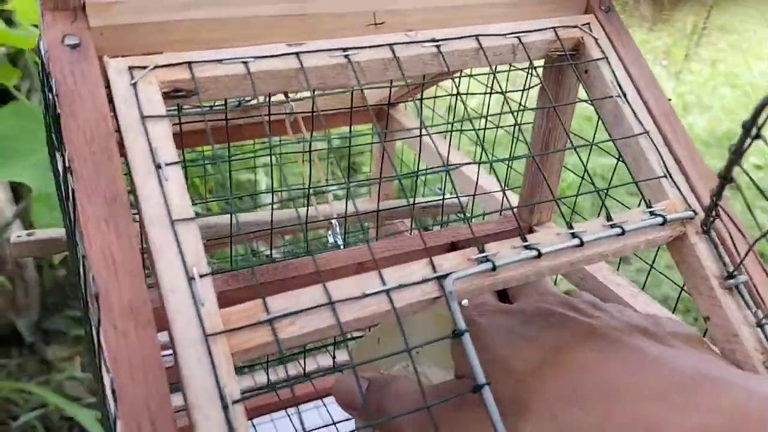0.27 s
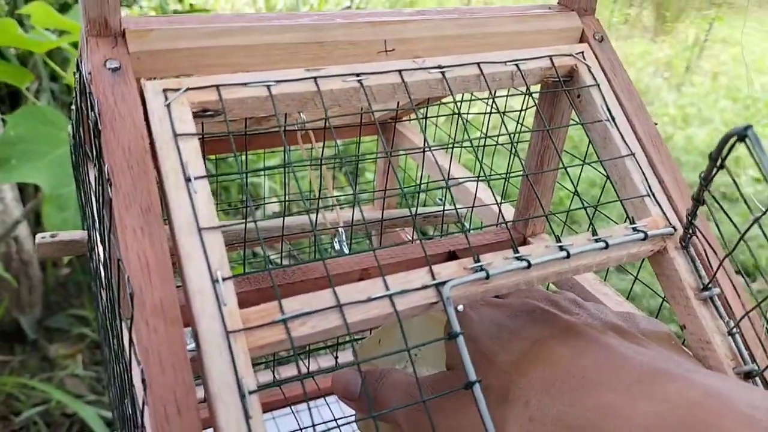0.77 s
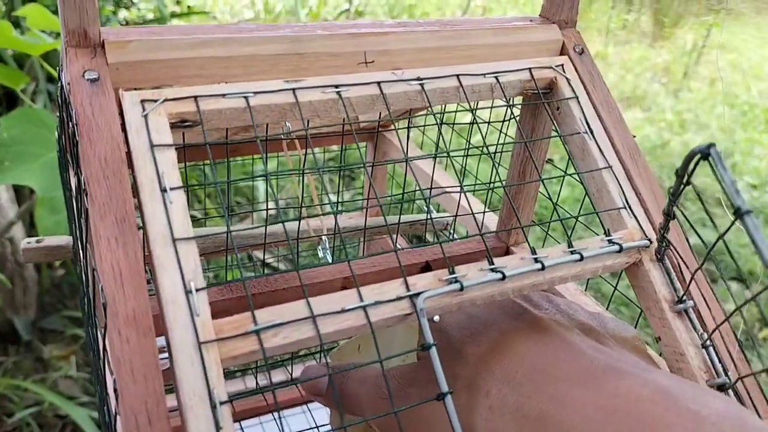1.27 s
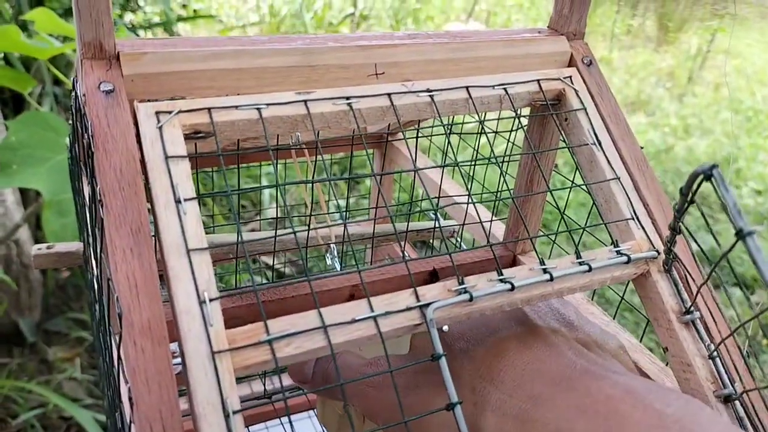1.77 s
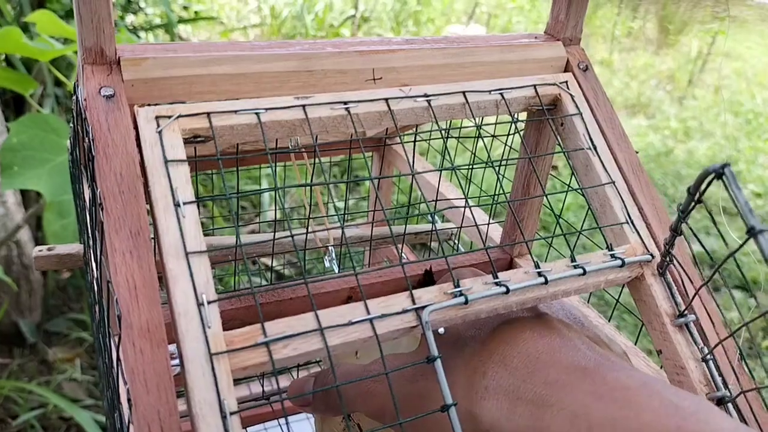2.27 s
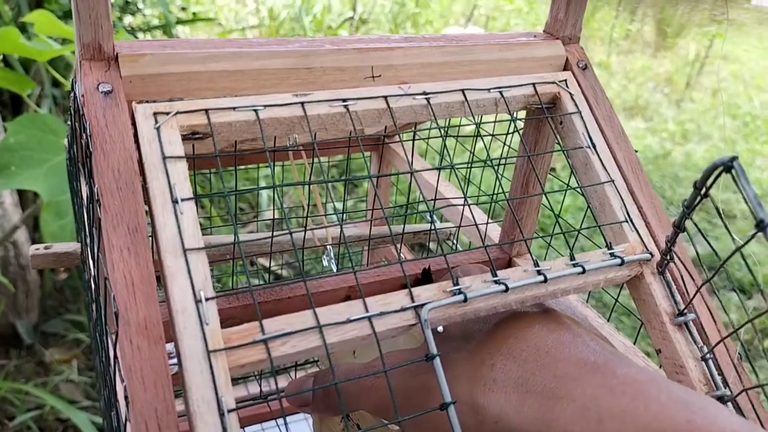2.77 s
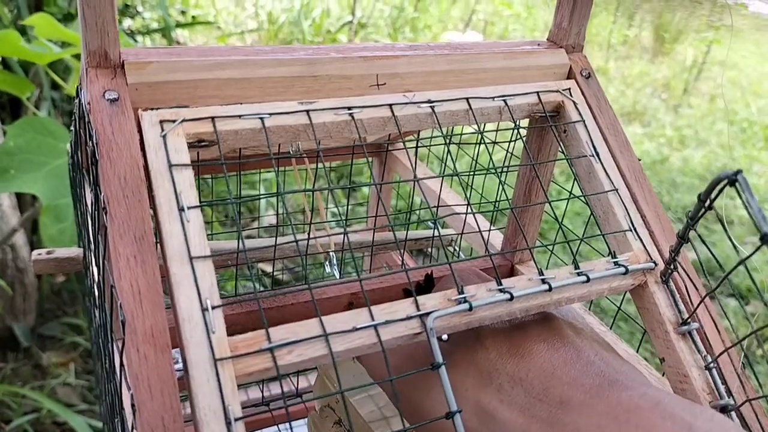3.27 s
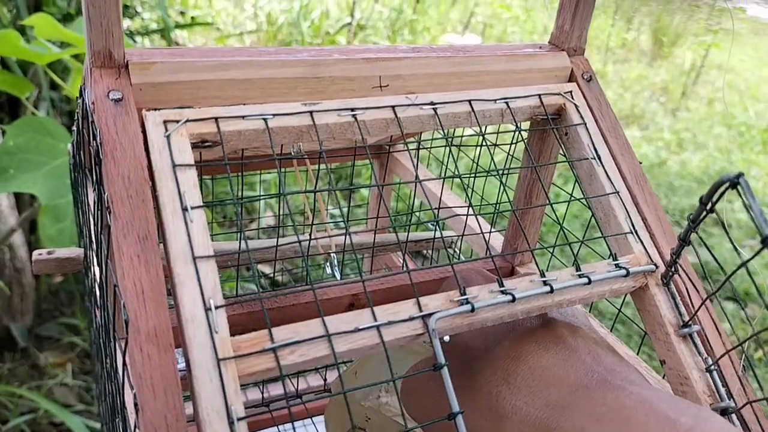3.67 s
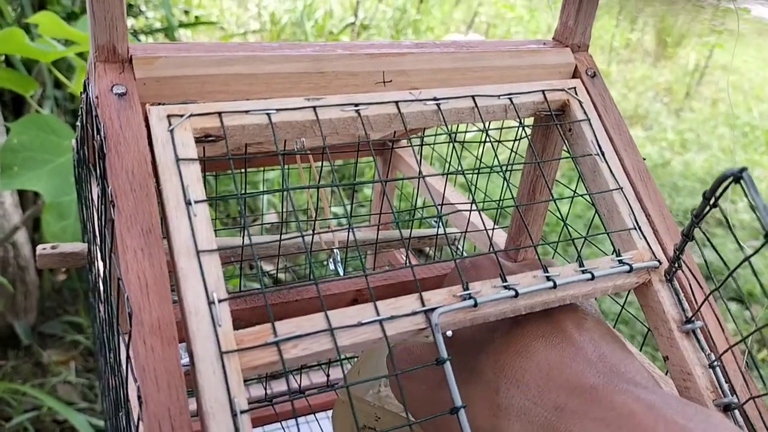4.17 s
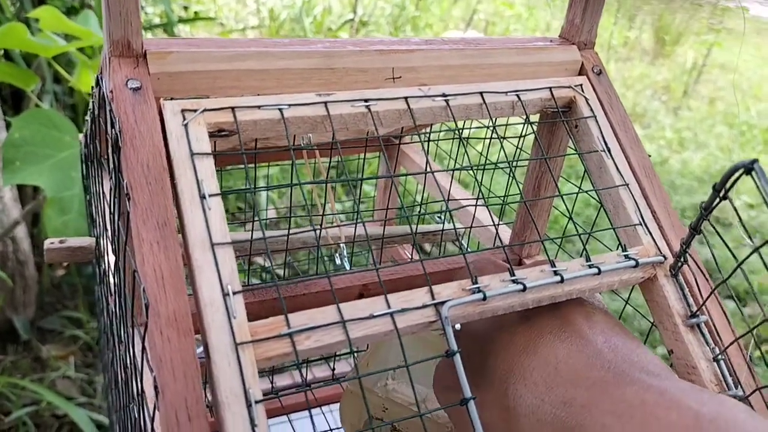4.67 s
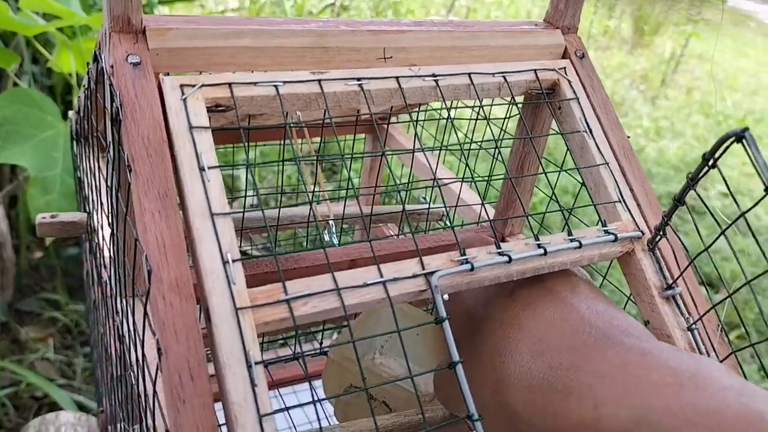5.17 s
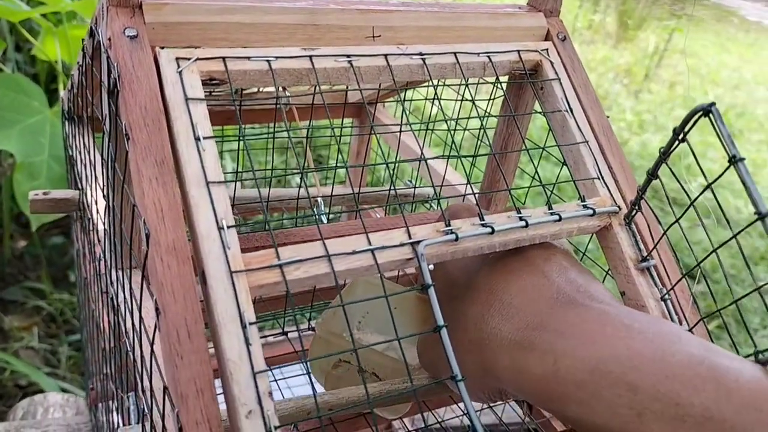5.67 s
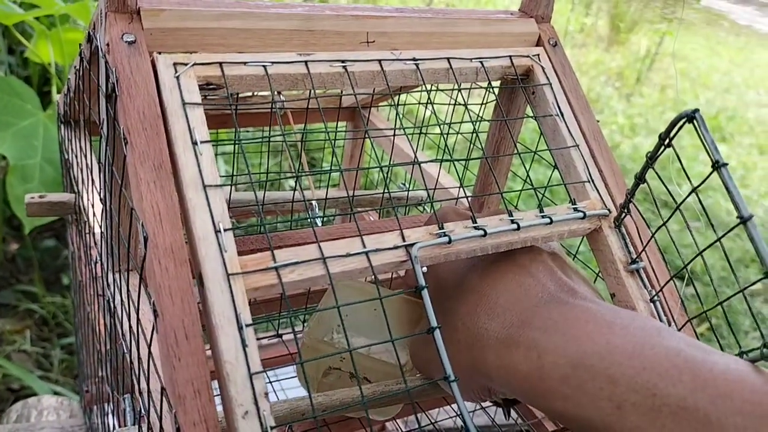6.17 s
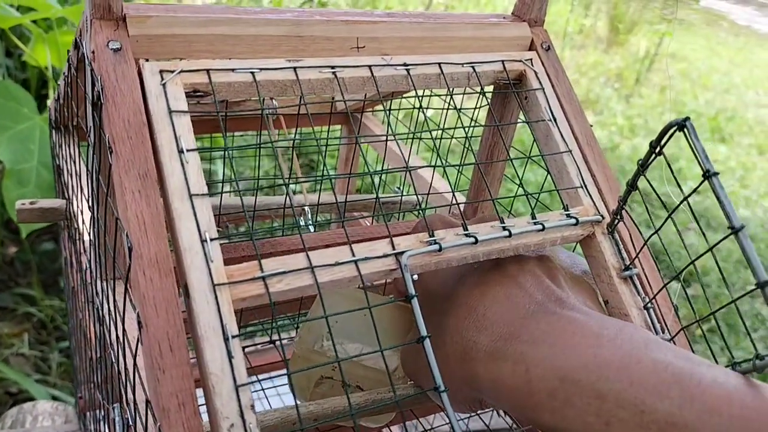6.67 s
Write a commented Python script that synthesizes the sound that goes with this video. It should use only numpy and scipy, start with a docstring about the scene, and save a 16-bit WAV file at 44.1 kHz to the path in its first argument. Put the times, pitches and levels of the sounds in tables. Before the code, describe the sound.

A soft rush of outdoor air and a faint, low engine drone far away run throughout. From about 0.6 to 1 second, a small bird in a nearby cage gives four quick, high, rising chirps, with a soft wooden bump at the last. Between 1 and 4 seconds the wire mesh ticks lightly and is brushed faintly by a reaching arm, while distant birds add a few thin whistles. A short cluster of knocks on the wooden frame comes around 3.7 seconds, and a wire snaps with a brief metallic ring at 4.6 seconds. Then the seized bird screams three times, at about 5, 5.7 and 6.4 seconds. Each scream lasts half a second and is loud, harsh and wavering, sinking in pitch at its end; the first is the raspiest. The screams are close and much louder than everything else, with little echo.

```python
"""In a garden, a hand reaches into a wood-and-wire cage trap. An engine drones far away over the soft rush
of the air, and birds whistle thinly in the trees. The struck frame and mesh knock and tick in their damped
modes. A small bird gives four quick rising chirps; seized, it screams three times, harsh and wavering,
as its overdriven syrinx oscillates unevenly and excites the resonances of the cage. The sound is mono."""
import sys
import numpy as np
from scipy import signal
from scipy.fft import rfft, irfft, next_fast_len
from scipy.io import wavfile
from scipy.ndimage import map_coordinates

SR = 44100
rng = np.random.default_rng(int(sys.argv[2]) if len(sys.argv) > 2 else 0)


def put_to_file(sound):
    """Save the sound as 16-bit audio at rate SR, in the file named by the first command-line argument."""
    columns = np.atleast_2d(sound).T  # one column per channel
    safe = np.clip(columns, -1, 1)
    whole_steps = np.round(safe * 32767)
    wavfile.write(sys.argv[1], SR, whole_steps.astype(np.int16))


N = 305172


def amp(db):
    return 10 ** (np.asarray(db) / 20)


def unit(x):
    return x / np.sqrt(np.mean(x ** 2) + 1e-20)


def along(points, hz):
    """Interpolation of (f/Hz, value) points on a logarithmic frequency axis."""
    f, v = np.transpose(points)
    return np.interp(np.log(hz + 1), np.log(f + 1), v)


def curve(points, t):
    """Linear interpolation of (t/s, value) points."""
    return np.interp(t, *np.transpose(points))


def wobble(rate, n):
    """Smooth random modulation: a spline through rate knots a second."""
    return map_coordinates(rng.standard_normal(int(n * rate / SR) + 4), [np.arange(n) * rate / SR])


def filtered(x, response):
    """Linear filtering: the spectrum of x times a complex frequency response."""
    m = next_fast_len(len(x) + SR // 2)
    return irfft(rfft(x, m) * response(np.fft.rfftfreq(m, 1 / SR)), m)[:len(x)]


def noise(spectrum, n):
    """Coloured Gaussian noise of rms 1."""
    return unit(filtered(rng.standard_normal(n), lambda hz: amp(along(spectrum, hz))))


def phase_of(hz):
    """Phase as the time integral of frequency."""
    return 2 * np.pi * np.cumsum(hz) / SR


def resonances(modes, f):
    """Modal superposition of second-order resonators (f/Hz, bandwidth/Hz, gain/dB)."""
    return sum(amp(db) * 1j * f * w / (c * c - f * f + 1j * f * w) for c, w, db in modes)


def add(track, s, sound):
    """Superposition of a sound on the track at s seconds."""
    i = round(s * SR)
    track[i:i + len(sound)] += sound[:len(track) - i]


# reverberation time of the yard: f/Hz, T60/s
YARD_T60 = [(300, 0.61), (2000, 0.2), (5000, 0.32), (12000, 0.26)]


def reverberant(x, walls_db, yard_db):
    """Direct sound, early reflections from slats and ground, and the exponential decay of the yard."""
    hz, t, spectra = signal.stft(rng.standard_normal(SR // 2), SR, nperseg=256)
    decay = amp(-60 * t / along(YARD_T60, hz)[:, None])
    tail = signal.istft(spectra * decay, SR, nperseg=256)[1]
    echo = amp(yard_db) * tail / np.linalg.norm(tail)
    delays = (rng.uniform(.001, .011, size=12) * SR).astype(int)
    echo[delays] += amp(walls_db) * rng.choice([-1, 1], size=12) / np.sqrt(12)
    return x + signal.fftconvolve(x, echo)[:N]


# spectral density of the garden's rush: f/Hz, relative level/dB
AIR_SPECTRUM = [(20, -53.5), (50, -10), (86, -13), (150, -2), (250, -11.5), (400, -22.5), (700, -19),
                (1250, -20.5), (1750, -30.5), (4100, -29), (4600, -35.5), (7300, -36.5), (9000, -58),
                (15000, -55.5)]


def garden_air(db=-65.5, db_per_s=-0.26):
    """Broadband ambient noise whose level eases slowly."""
    t = np.arange(N) / SR
    return amp(db + db_per_s * t) * noise(AIR_SPECTRUM, N)


# engine harmonics: multiple of the firing rate, relative level/dB
ENGINE_ORDERS = [(3, -83.5), (4, -67), (5, -64.5), (6, -73.5), (8, -76), (9, -78), (10, -82), (11, -83.5),
                 (12, -85)]
# envelope of the drone: t/s, relative level/dB
ENGINE_ENVELOPE = [(0.0, -62.5), (0.5, -61), (1.13, -58), (1.37, -63), (4.3, -66), (4.99, -78), (5.34, -64),
                   (6.92, -68)]


def engine(firing_hz=30.22, gain_db=64):
    """Periodic firing gives a harmonic series; each order drifts a little on its way through the air."""
    t = np.arange(N) / SR
    phase = phase_of(firing_hz * (1 + 0.00498 * wobble(0.98, N)))
    drone = sum(amp(db + 1.8 * wobble(3, N)) * np.cos(k * phase + 0.5 * wobble(3.2, N))
                for k, db in ENGINE_ORDERS)
    return amp(curve(ENGINE_ENVELOPE, t) + gain_db) * drone


# whistles in the trees: t/s, duration/s, start f/Hz, end f/Hz, level/dB
TREE_WHISTLES = [(1.662, 0.076, 6900, 3900, -72.5), (1.845, 0.24, 6870, 7050, -70.5),
                 (1.961, 0.056, 6980, 7560, -68.5), (2.789, 0.052, 7300, 6630, -68),
                 (4.376, 0.022, 7280, 6900, -67), (4.911, 0.041, 7380, 6530, -64.5)]


def whistles():
    """Gliding pure tones of distant birds, with more reverberant than direct sound."""
    out = np.zeros(N)
    for s, length, start_hz, end_hz, db in TREE_WHISTLES:
        u = np.linspace(0, 1, int(length * SR))
        hz = (start_hz + (end_hz - start_hz) * u) * (1 + 0.0072 * wobble(300, len(u)))
        add(out, s, amp(db) * np.sqrt(np.abs(np.sin(np.pi * u))) * np.sin(phase_of(hz)))
    return reverberant(out, walls_db=-10, yard_db=2)


# bumps on the frame: t/s, peak level/dB, low-pass corner f/Hz
FRAME_KNOCKS = [(.94, -55, 1300), (0.958, -55.5, 1000), (3.641, -50, 4050), (3.657, -37.5, 3980),
                (3.673, -46.5, 1400), (3.691, -53, 1300), (4.621, -63.5, 397), (6.852, -57, 400)]
# modes of the wood: f/Hz, bandwidth/Hz, gain/dB
WOOD_MODES = [(421, 21, 2.5), (752, 71, -2), (1040, 140, -2), (1227, 170, -3.5), (1435, 120, -6),
              (2360, 200, -6), (2690, 91, -11), (3870, 120, -13)]


def frame(blow_t60=0.085):
    """Impact excitation: short scuffing blows ring the modes of the wooden frame; soft ones are duller."""
    out, t = np.zeros(N), np.arange(SR // 5) / SR
    for s, db, corner_hz in FRAME_KNOCKS:
        blow = rng.standard_normal(len(t)) * amp(-60 * t / blow_t60)
        knock = filtered(blow, lambda f: resonances(WOOD_MODES, f) / (1 + 1j * f / corner_hz) ** 2)
        add(out, s, amp(db) * knock / np.abs(knock).max())
    return reverberant(out, walls_db=-8, yard_db=-10)


# mesh flicking against the frame: t/s, relative level/dB
MESH_TICKS = [(1.5048, -52), (1.5728, -55.5), (2.1016, -57), (2.4279, -57.5), (2.687, -58), (2.736, -55),
              (2.8962, -51.5), (3.0094, -61), (3.695, -51.5), (3.777, -53), (3.8516, -58), (4.032, -59.5)]
# the stiff door wire springing: t/s, relative level/dB
DOOR_SNAP = [(4.618, -29.5)]
# modes of the wire: f/Hz, relative level/dB, T60/s
WIRE_MODES = [(2370, -15, 0.11), (2480, -8, 0.03), (2690, -1, 0.04), (2800, -2.5, 0.046),
              (3830, -7.5, 0.047), (4870, -14, 0.086), (5400, -13, 0.037), (5870, -3, 0.018),
              (8200, -38, .05)]
# contact noise of the mesh: f/Hz, relative level/dB
CONTACT_SPECTRUM = [(300, -19), (1500, -5.5), (2700, 0.5), (3800, 4), (5500, 4), (7600, 3), (9000, -17),
                    (14000, -24.5)]


def wire_strikes(crack_t60=.03, contact_s=.0005):
    """Damped free vibration of struck wire plus contact noise: the ticks mostly crack, the snap rings."""
    out, t = np.zeros(N), np.arange(SR // 4) / SR
    onset = 1 - np.exp(-t / contact_s)
    for strikes, ring_db, crack_db in [(MESH_TICKS, -15, -5), (DOOR_SNAP, -5, -16)]:
        for s, db in strikes:
            ring = sum(amp(level - 60 * t / t60) * np.sin(2 * np.pi * (hz * t + rng.random()))
                       for hz, level, t60 in WIRE_MODES)
            crack = amp(-60 * t / crack_t60) * noise(CONTACT_SPECTRUM, len(t))
            add(out, s, onset * (amp(db + ring_db) * ring + amp(db + crack_db) * crack))
    return out


# arm and feathers brushing the mesh: t/s, duration/s, level/dB
MESH_BRUSHES = [(0.996, 0.097, -65), (1.469, 0.23, -71), (2.069, 0.18, -72.5), (2.935, 0.12, -76),
                (3.314, 0.1, -76), (3.703, 0.22, -67), (4.641, 0.15, -75)]
# resonances of the slatted cage: f/Hz, bandwidth/Hz, gain/dB re the direct sound
CAGE_MODES = [(1120, 62, -4), (2229, 59, 2.5), (2646, 89, 2.5), (3170, 13, -22), (3714, 51, 7),
              (4000, 77, 7), (4313, 58, 4.5), (4812, 70, 3.5), (5056, 42, -4.5), (5650, 46, -18),
              (5490, 56, -8), (5970, 43, -15), (6850, 66, -5), (7190, 130, 0.5)]


def brushing():
    """Uneven friction noise, coloured by the resonances of the cage."""
    out = np.zeros(N)
    for s, length, db in MESH_BRUSHES:
        n = int(length * SR)
        friction = amp(2.6 * wobble(110, n)) * noise(CONTACT_SPECTRUM, n)
        scrape = filtered(friction, lambda f: 1 + resonances(CAGE_MODES, f))
        add(out, s, amp(db) * np.sqrt(np.abs(np.hanning(n))) * unit(scrape))
    return out


def mesh():
    """Impact and friction sounds of the mesh share one set of reflections."""
    return reverberant(wire_strikes() + brushing(), walls_db=-12, yard_db=-16)


# response of the throat and open beak: f/Hz, gain/dB
VOCAL_TRACT = [(500, -55.5), (1350, -24), (1600, -17), (2400, -12), (3400, -2.5), (3750, -0.5), (4750, 5),
               (5150, 1), (5800, 8), (7250, 2), (7900, -9), (9700, -41), (12000, -25), (15000, -29.5)]
# chirps in the cage: t/s, duration/s, level/dB, upper limit of the sweep f/Hz
CAGE_CHIRPS = [(.592, 0.053, -38.5, 5790), (0.702, 0.053, -38.5, 5550), (.820, .056, -37, 5550),
               (0.938, 0.052, -37, 5470)]
# three swells of each chirp: t/s from its start, half width/s, f/Hz, relative level/dB
CHIRP_SWELLS = [(.001, 0.0014, 3994, -6.5), (0.0248, 0.0082, 4950, -1), (.047, 0.0043, 5900, -.5)]


def chirps(lead_s=0.0036, fade_s=.004, puff_db=-27, puff_s=0.0069, glide_hz_per_s=25000, floor_db=-11.5):
    """Frequency modulation: after a puff of noise a tone sweeps up, slowing to a glide on each swell."""
    out = np.zeros(N)
    sweep = [(at + side * width, centre_hz + side * width * glide_hz_per_s)
             for at, width, centre_hz, _ in CHIRP_SWELLS for side in (-1, 1)]
    for s, length, db, top_hz in CAGE_CHIRPS:
        t = np.arange(-2 * puff_s, length, 1 / SR)
        hz = np.minimum(curve(sweep, t), top_hz)
        phase = phase_of(hz * (1 + 0.012 * wobble(300, len(t))))
        tone = np.sin(phase) + amp(-53) * np.sin(2 * phase)
        swells = sum(amp(level) * np.exp(-((t - at) / width) ** 2) for at, width, _, level in CHIRP_SWELLS)
        edges = np.clip(np.minimum(1 + t / lead_s, (length - t) / fade_s), 0, 1)
        envelope = np.maximum(swells, amp(floor_db)) * edges
        puff = amp(puff_db) * np.exp(-(t / puff_s) ** 2) * noise(VOCAL_TRACT, len(t))
        add(out, s + t[0], amp(db) * (envelope * tone + puff))
    return reverberant(out, walls_db=-11, yard_db=-2)


def rasp(age, corner_hz=4800, dull_db=15, opening_s=0.071, shimmer_db=1.5):
    """Turbulence noise shaped by the vocal tract: dull until the beak opens, its treble flickering."""
    n = len(age)
    hiss = noise(VOCAL_TRACT, n)
    treble = filtered(hiss, lambda f: 1 - 1 / (1 + (f / corner_hz) ** 8))
    treble_db = -dull_db * np.exp(-age / opening_s) + shimmer_db * wobble(44.9, n)
    return (hiss + treble * (amp(treble_db) - 1)) * amp(0.58 * wobble(300, n))


def catches(rough, max_per_s=130, half_width_s=.0022, depth=.75):
    """Poisson process of brief catches of the syrinx, commoner when rough: level dips and phase slips."""
    events = rng.random(len(rough)) < max_per_s * rough / SR
    shape = np.hanning(int(2 * half_width_s * SR))
    dip = np.minimum(signal.fftconvolve(events * 1., shape, "same"), 1)
    jumps = events * rng.standard_normal(len(rough)) / 2
    slip = np.cumsum(signal.fftconvolve(jumps, shape / shape.sum(), "same"))
    return 1 - depth * dip, slip


# first three source harmonics: level/dB at middle_hz, slope/(dB per octave of pitch), growth/dB
SYRINX_HARMONICS = [(-1.5, -9, 5), (-0.5, 4.5, 6), (-4.5, -9.5, 24.5)]


def syrinx(hz, rough, slack, middle_hz=2000, waver=.015, jitter=0.017, flutter_db=3.5, smear_rad=.6):
    """Source-filter model of the overdriven syrinx: uneven cycles, harmonics weighted by the tract."""
    n = len(hz)
    catch_gain, slip = catches(rough)
    phase = slip + phase_of(hz * (1 + rough * (waver * wobble(170.06, n) + jitter * wobble(2000, n))))
    # the tone brightens with effort and as its pitch sinks
    source_db = [db + slope * np.log2(hz / middle_hz) - growth * slack
                 for db, slope, growth in SYRINX_HARMONICS]
    source_db += [source_db[2] - 2 * np.log2(k / 3) for k in range(4, 9)]
    tone = np.zeros(n)
    for k, db in enumerate(source_db, 1):
        level_db = db + along(VOCAL_TRACT, k * hz) + flutter_db * rough * wobble(198.1, n)
        smear = smear_rad * max(k - 4, 0) * rough * wobble(900, n)
        tone += amp(level_db) * np.sin(k * phase + smear)
    # fitful modulation at a half and a third of the pitch adds sidebands
    subharmonics = wobble(120.1, n) * np.cos(phase / 2) + wobble(120, n) * np.cos(phase / 3)
    return catch_gain * tone * (1 + .33 * rough * subharmonics)


def scream(pitch, start, end, swell_s, hoarse_s, tone_db, rasp_db, rasp_growth_db, drift_db_per_s,
           roughness, attack_s=0.018, release_s=0.017, edge_db=7, hoarse_db=11, break_s=0.023):
    """Periodic tone plus turbulent rasp; the tone is weaker and rougher at its hoarse start and end."""
    t = np.arange(start, end, 1 / SR)
    age, left = t - start, end - t
    slack = np.clip(1 - age / swell_s, 0, 1)  # share of the effort still to come
    hoarse = np.exp(-(age / hoarse_s) ** 4) + np.exp(-left / break_s)
    rough = np.clip(roughness + (1 - roughness) * hoarse, 0, 1)
    tone = syrinx(curve(pitch, t), rough, slack)
    throb_db = wobble(44.9, len(t))  # the effort is never quite steady
    tone *= amp(tone_db - hoarse_db * hoarse + throb_db)
    hiss = rasp(age) * amp(rasp_db - rasp_growth_db * slack)
    gate_db = -edge_db * np.clip(np.maximum(1 - age / attack_s, 1 - left / release_s), 0, 1)
    edges = np.clip(np.minimum(age, left) / 0.0028, 0, 1)
    return edges * amp(gate_db + drift_db_per_s * age) * (tone + hiss)


# screams: start t/s, end t/s, swell/s, hoarse onset/s, tone level/dB, rasp level/dB,
# rasp growth over the swell/dB, level drift/(dB/s), roughness (0-1)
DISTRESS_CALLS = [(4.995, 5.508, 0.15, .085, -29, -31.5, 11, -4.5, 0.25),
                  (5.694, 6.171, .085, 0.021, -31, -38.5, -4, 8.5, .34),
                  (6.424, 6.899, 0.34, .04, -31.5, -43, -3.5, 7.5, .36)]
# fundamental frequency, one contour per scream: t/s, f/Hz
PITCH_CONTOURS = [
    [(5.0, 1863), (5.036, 2091), (5.058, 1855), (5.118, 1748), (5.204, 1976), (5.232, 1860), (5.276, 1943),
     (5.37, 1720), (5.394, 1602), (5.43, 1679), (5.48, 1613), (5.505, 1482)],
    [(5.71, 1925), (5.72, 1823), (5.73, 2268), (5.79, 2378), (5.844, 2230), (5.858, 2225), (5.968, 2171),
     (5.988, 2091), (6.11, 2004), (6.13, 1973), (6.144, 1873), (6.16, 1624)],
    [(6.45, 2414), (6.48, 2359), (6.486, 2371), (6.506, 2314), (6.566, 2388), (6.65, 2326), (6.716, 2138),
     (6.75, 2195), (6.806, 2082), (6.868, 1884), (6.884, 1663), (6.893, 1670)],
]
# overall tone colour of the screams, lows trimmed and a dip near 9 kHz: f/Hz, gain/dB
SCREAM_COLOUR = [(600, -6.5), (1500, 1.5), (1950, -4.5), (2300, -1.5), (7350, -1.5), (7650, -5), (8400, -4),
                 (9300, -12.5), (11000, -3.5), (12000, 1)]


def screams():
    """Forced resonance: three distress calls, shaped by one tone colour, ring the cage."""
    out = np.zeros(N)
    for pitch, call in zip(PITCH_CONTOURS, DISTRESS_CALLS):
        add(out, call[0], scream(pitch, *call))
    out = filtered(out, lambda f: amp(along(SCREAM_COLOUR, f)) * (1 + resonances(CAGE_MODES, f)))
    return reverberant(out, walls_db=-15, yard_db=-19.5)


def scene():
    """Superposition of all sources, the same in both channels."""
    mono = screams() + chirps() + whistles() + frame() + mesh() + engine() + garden_air()
    return np.array([mono, mono])


def record(dry, top_hz=15500):
    """Band limiting by an ideal low-pass filter."""
    return np.array([filtered(x, lambda hz: hz < top_hz) for x in dry])


dry = scene()
out = record(dry)
put_to_file(out)
```